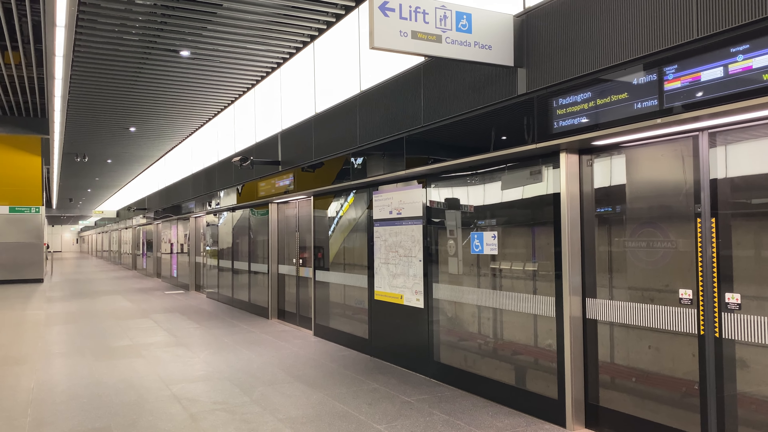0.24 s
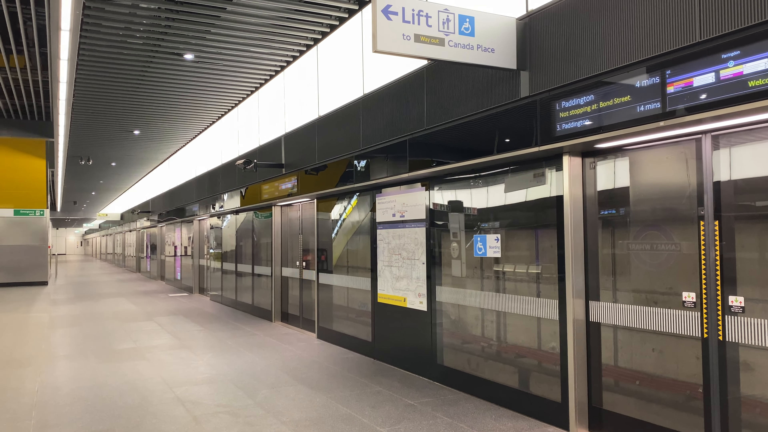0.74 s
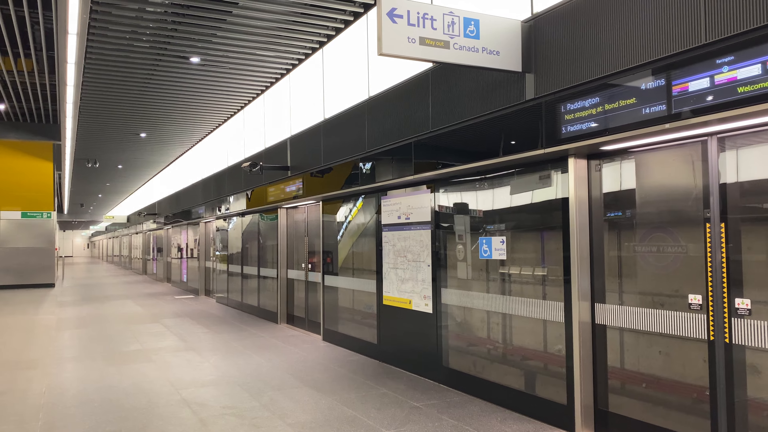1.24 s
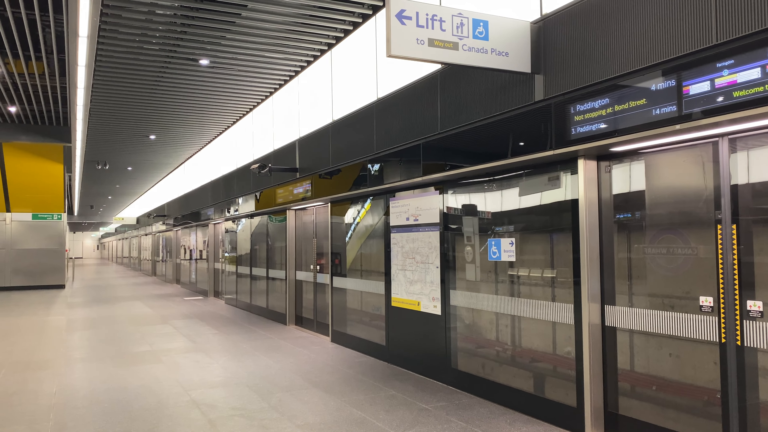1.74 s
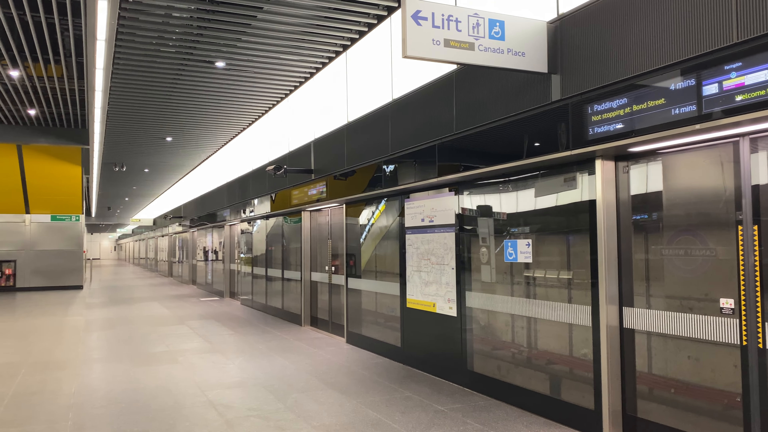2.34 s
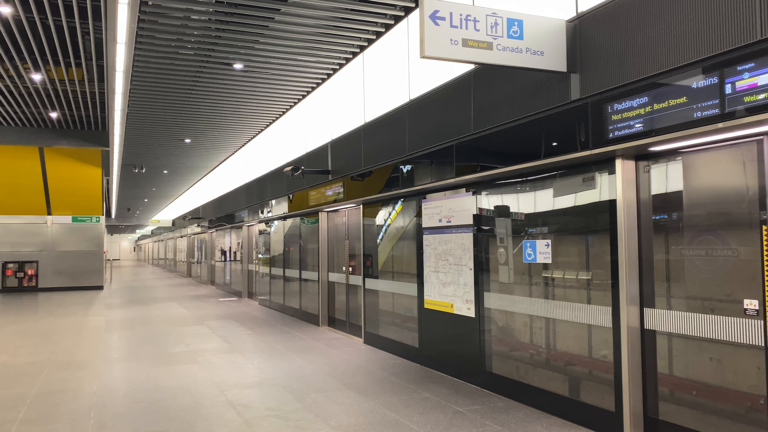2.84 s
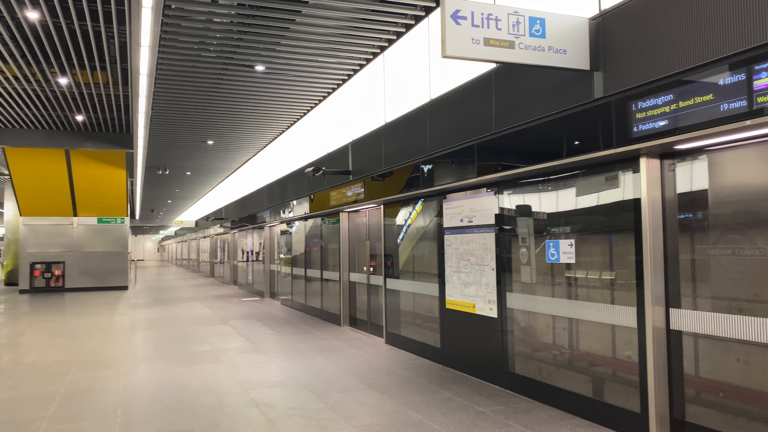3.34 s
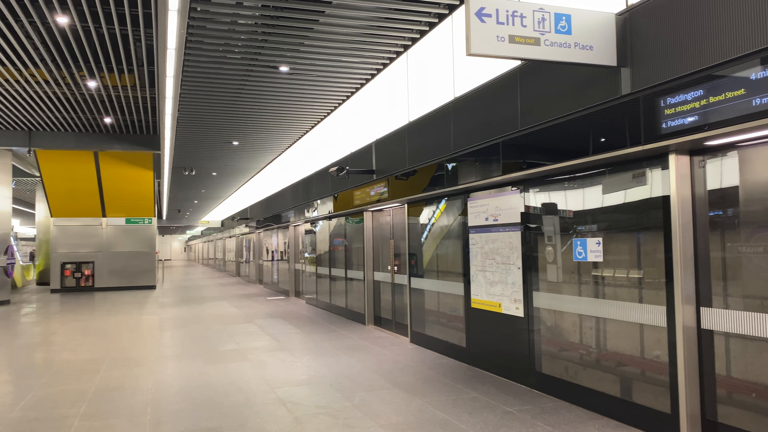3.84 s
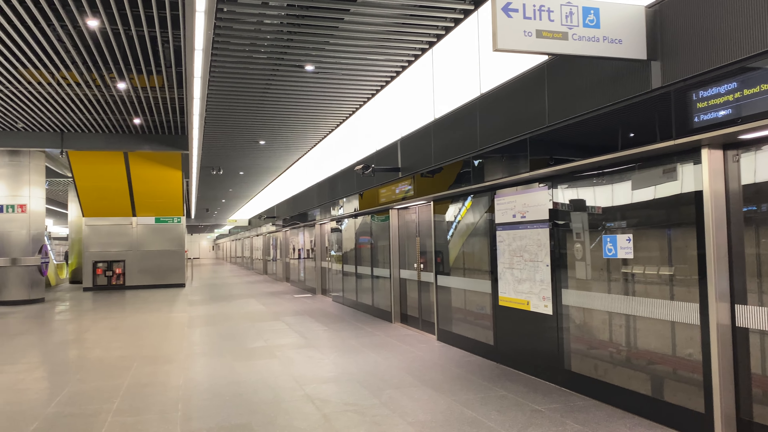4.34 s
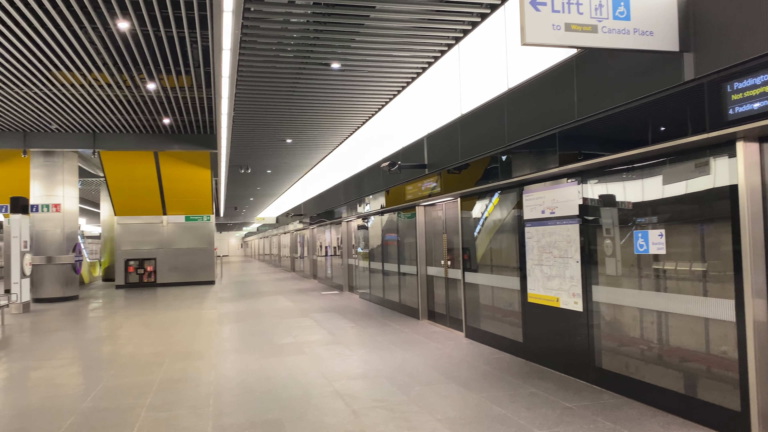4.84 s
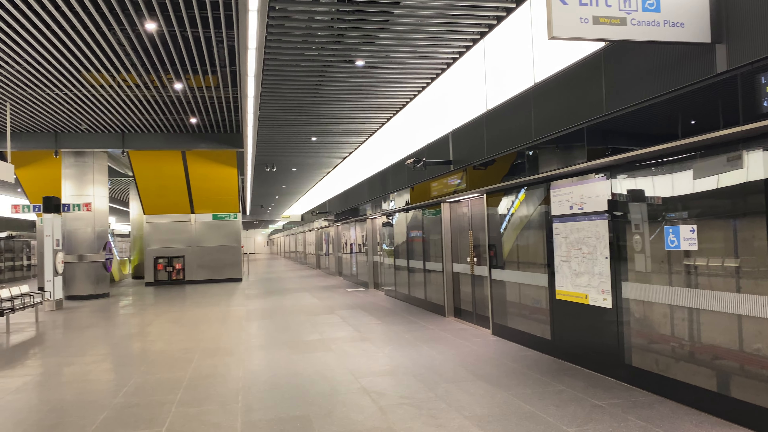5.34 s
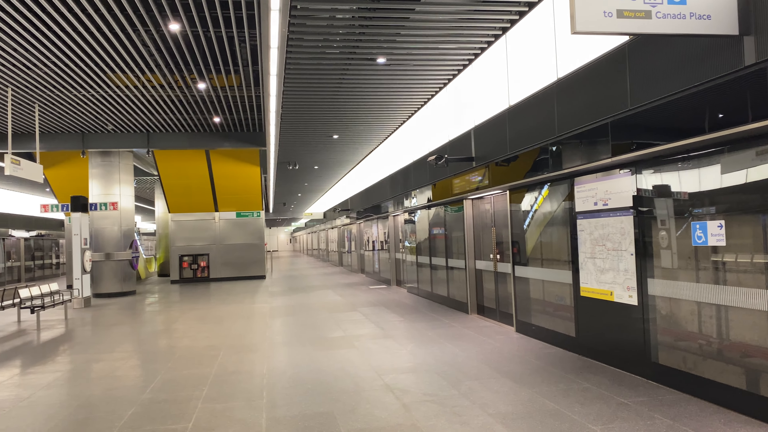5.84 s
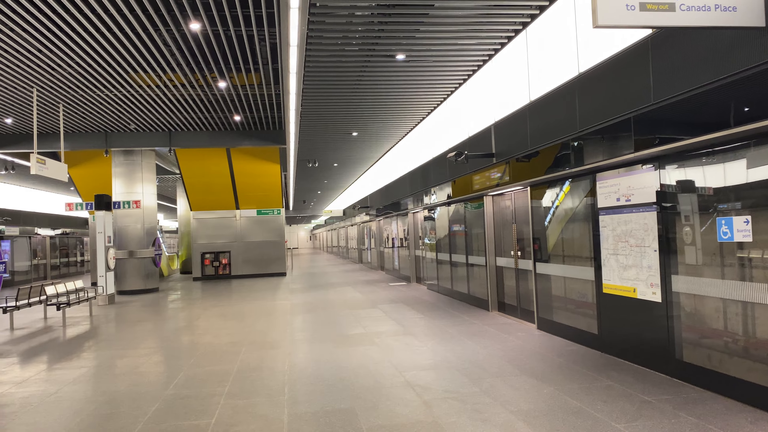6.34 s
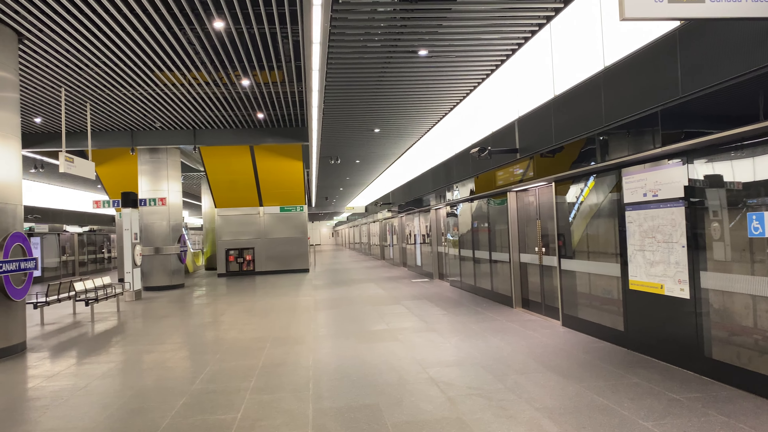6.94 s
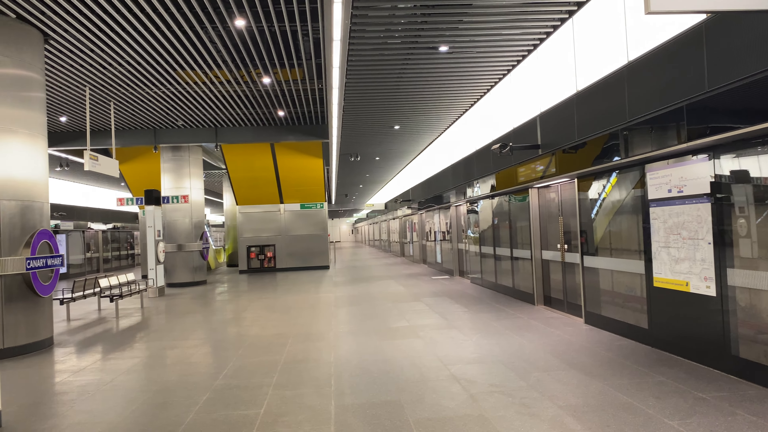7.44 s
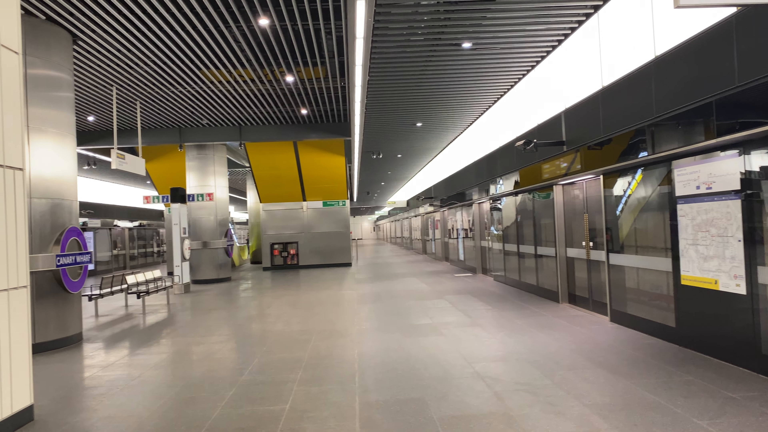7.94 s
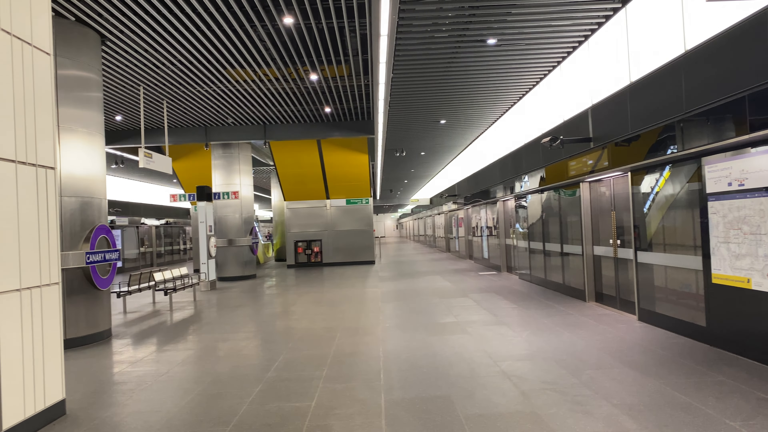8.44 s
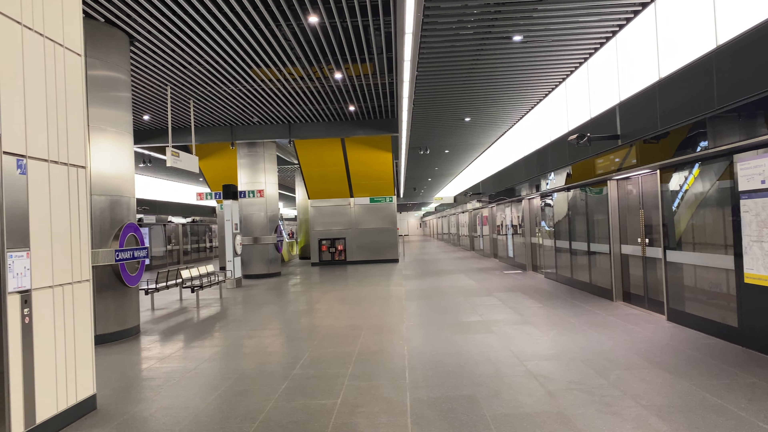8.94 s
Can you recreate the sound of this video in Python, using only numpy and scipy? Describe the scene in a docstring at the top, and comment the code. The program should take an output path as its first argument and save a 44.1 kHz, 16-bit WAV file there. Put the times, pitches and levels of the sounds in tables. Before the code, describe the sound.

On a hard, echoing underground platform, an electric train accelerates away behind glass screens. Fluttering motor tones rise in pitch over deep rumble and rushing wheel roar, with faint rail singing. The last car passes at about three and a half seconds, and the train recedes to a far rumble. Ventilation hiss, a thin electrical whine and light metal clinks remain. The stereo microphone stands on the platform, the train slightly right.

```python
"""An underground station with glass platform screens, as an electric train pulls out.
Its motors drone upward in pitch: wandering tones, one set Doppler-sharp and one flat, with a smeared echo.
Coloured noise makes the wheel roar, which sinks to a far rumble; swelling tones are rail and tunnel resonances.
Left behind are ventilation hiss (noise), a thin electrical whine (wavering tones)
and a few light metal clinks (noise bursts and decaying modes)."""
import sys
import numpy as np
from scipy import signal
from scipy.fft import rfft, irfft, next_fast_len
from scipy.io import wavfile
from scipy.ndimage import uniform_filter1d, map_coordinates

SR = 44100
rng = np.random.default_rng(int(sys.argv[2]) if len(sys.argv) > 2 else 0)


def wrap_up_sound(samples):
    """Save the sound to the file named by the first command line argument, as 16-bit audio."""
    columns = np.atleast_2d(samples).T
    # keep every value between -1 and 1, then stretch to whole-number steps
    tamed = np.clip(columns, -1, 1)
    steps = np.round(tamed * 32767).astype(np.int16)
    wavfile.write(sys.argv[1], SR, steps)


N = 404838
TIME = np.arange(N) / SR  # seconds


def amp(db):
    """Decibels to gain."""
    return 10 ** (np.asarray(db) / 20)


def unit(x):
    """Scale to rms 1."""
    return x / np.sqrt(np.mean(np.abs(x) ** 2) + 1e-20)


def along(points, hz):
    """Read (hz, value) points along a log frequency axis."""
    f, v = np.transpose(points)
    return np.interp(np.log(hz + 1), np.log(np.abs(f) + 1), v)


def curve(points):
    """Join (time_s, value) points with straight lines, one value per sample."""
    s, v = np.transpose(points)
    return np.interp(TIME, s, v)


def wobble(rate):
    """A smooth random curve with rate knots a second."""
    knots = np.random.default_rng(rng.integers(2 ** 31)).standard_normal(int(N * rate / SR) + 8)
    coarse = TIME[::32]
    smooth = map_coordinates(knots, [coarse * rate + 2], mode="mirror")
    return np.interp(TIME, coarse, smooth)


def filtered(x, response):
    """Shape the spectrum of x by a response given as a function of frequency."""
    m = next_fast_len(N + SR // 2)
    spectrum = rfft(x, m) * response(np.fft.rfftfreq(m, 1 / SR))
    return irfft(spectrum, m)[..., :N]


def rush(spectrum, patchy_db):
    """Two noises of joint rms 1, coloured by the spectrum, with drifting patches of gain in time and pitch."""
    z = signal.stft(rng.standard_normal((2, N)), nperseg=1024)[2]
    patches = uniform_filter1d(rng.standard_normal(z.shape[1:]), size=4, axis=0)
    patches = uniform_filter1d(patches, size=14, axis=1)
    pair = signal.istft(z * amp(patchy_db * unit(patches)), nperseg=1024)[1][:, :N]
    return unit(filtered(pair, lambda hz: amp(along(spectrum, hz))))


def smeared(hz, wander_hz, evenness=0):
    """A tone arriving by many changing paths: strength and phase wander, with wander_hz random knots a second."""
    paths = np.array([wobble(wander_hz) + 1j * wobble(wander_hz) for _ in range(2)])
    # evenness 1 nearly levels the strength and leaves the phase wandering
    paths = paths / (np.abs(paths) ** 2 + .1) ** (np.clip(evenness, 0, 1) / 2)
    carrier = np.exp(2j * np.pi * np.cumsum(hz + np.zeros(N)) / SR)
    return unit((paths * carrier).real)


def drone(hz, wander_rad):
    """A fluttering tone whose phase drifts by wander_rad in the first signal and more widely in the second."""
    flutter_db, flutter_rate = 2, 11  # typical depth, knots per second
    drift = np.array([wander_rad * wobble(7), np.pi * wobble(3)])
    drift = drift + rng.uniform(0, 2 * np.pi, (2, 1))
    tone = np.sin(2 * np.pi * np.cumsum(hz) / SR + drift)
    return unit(amp(flutter_db * wobble(flutter_rate)) * tone)


def motor_pitch():
    """The motor tone in Hz, rising with the train's speed, which grows ever more slowly."""
    start_hz, cruise_hz, speed_up_s = 142, 197, 4.6
    return cruise_hz - (cruise_hz - start_hz) * np.exp(-TIME / speed_up_s)


def receding(near_db, loss_db):
    """Gain of a layer that far off loses loss_db each time the distance to the train's tail doubles."""
    metres_per_cycle = 0.085  # track covered in one cycle of the motor tone
    tail_start_m = 9  # travel before the tail draws away
    near_m = 23.2  # distance within which the level nearly holds
    travel_m = metres_per_cycle * np.cumsum(motor_pitch()) / SR
    away_m = np.clip(travel_m - tail_start_m, 0, None)
    return amp(near_db - loss_db * np.log2(np.hypot(1, away_m / near_m)))


def tail_gone():
    """Rises smoothly from 0 to 1 as the last car passes the listener."""
    gone_s, pass_s = 3.53, .08  # midpoint, quickness
    return (1 + np.tanh((TIME - gone_s) / pass_s)) / 2


def motors():
    """Cars still approaching sound sharp, those gone by sound flat; echoes fill the gap between."""
    # tone of the cars approaching, swelling and fading in the tunnel: time_s, relative level_db
    ahead_levels = [(0, -20), (.33, -31), (.55, -27), (.75, -15.5), (1.0, -33.5), (1.35, -27), (1.8, -41),
                    (2.0, -18), (2.3, -47), (2.55, -25.5), (3.1, -23), (3.4, -29), (3.67, -39), (3.85, -26),
                    (4.03, -40.5), (4.3, -32), (4.7, -29.5), (5.07, -37.5), (5.38, -28), (5.85, -42),
                    (6.08, -31), (6.28, -36), (6.52, -27), (6.9, -42), (9.16, -47)]
    # tone of the cars that have gone by: time_s, relative level_db
    behind_levels = [(0, -20.5), (.3, -23.5), (.85, -27.5), (1.02, -16.5), (1.22, -26.5), (1.45, -21.5),
                     (1.73, -16.5), (1.92, -30), (2.2, -34.5), (2.45, -18.5), (2.7, -31.5), (3.0, -24.5),
                     (3.3, -22.5), (3.5, -25.5), (3.65, -40), (4.25, -32), (4.5, -39), (4.85, -28.5),
                     (5.1, -38), (5.3, -26.5), (5.85, -43), (9.16, -50)]
    # octave of the nearest bogie, its rise held back by Doppler shift: time_s, pitch_hz
    bogie_pitch = [(0, 286), (.8, 293), (1.3, 300), (1.7, 311), (2.2, 318), (3, 322)]

    hz = motor_pitch()
    doppler_start, doppler_full, doppler_s = .023, .044, .9  # shares of the pitch, time constant
    doppler = doppler_full - (doppler_full - doppler_start) * np.exp(-TIME / doppler_s)
    ahead = amp(curve(ahead_levels)) * drone(hz * (1 + doppler), wander_rad=.45)
    behind = amp(curve(behind_levels)) * drone(hz * (1 - doppler), wander_rad=.35)
    echoes = receding(near_db=-32.5, loss_db=6.5) * smeared(hz, wander_hz=40)
    tone = amp(-1.45) * (ahead + behind) + echoes

    # the octave is strong until the last driven bogie has passed; a faint echo stays
    bogie_gone_s, bogie_fade_db_per_s = 2.36, 18.5
    bogie = amp(-bogie_fade_db_per_s * np.clip(TIME - bogie_gone_s, 0, None))
    passing = amp(-29) * bogie * drone(curve(bogie_pitch), wander_rad=.55)
    wash_gain = np.hypot(amp(-27.2) * bogie, receding(near_db=-37, loss_db=4))
    wash = wash_gain * smeared(1.96 * hz, wander_hz=85)
    return tone + passing + wash


def rolling():
    """Wheels on rail shake the ground, roar down the tunnel and hiss through the screens while near."""
    # noise colours of the ground, the tunnel bore and the near wheels: pitch_hz, level_db per Hz
    ground_colour = [(20, -62.5), (32, -30.5), (48, -14.5), (65, -7.5), (82, -8.5), (102, -1), (135, -2),
                     (200, -7), (240, -11.5), (300, -19.5), (450, -40), (900, -88)]
    bore_colour = [(150, -9.5), (260, 2), (370, 0.5), (410, -4.5), (520, -3.5), (680, 0), (880, -2.5),
                   (1000, -7), (1120, -4), (1320, -11), (1400, -19), (2200, -24.5), (4000, -77)]
    wheel_colour = [(150, 5), (300, 11), (450, 19), (700, 12), (1000, -6.5), (1450, 6), (1750, 1),
                    (2100, -1), (2750, -5), (3100, -11.5), (4200, -18.5), (6000, -26.5), (12000, -58.5),
                    (13000, -50.5)]
    hiss_colour = [(2500, -11.5), (5500, 5.5), (8000, -13.5), (12000, -12.0), (13000, -29.5)]

    rumble = receding(near_db=-24, loss_db=2.5) * rush(ground_colour, patchy_db=0)
    bore = amp(0.42 * wobble(8.9)) * rush(bore_colour, patchy_db=1.8)
    tunnel = receding(near_db=-28.5, loss_db=5.5) * bore

    tail_drop_db = 1.75  # the wheel noise drops as the last car passes
    wheel_level_db = .3 * wobble(11) + 0.79 * wobble(60) - tail_drop_db * tail_gone()
    beside = amp(wheel_level_db) * rush(wheel_colour, patchy_db=1.5)
    wheels = receding(near_db=-31.5, loss_db=6.5) * beside

    # the brightest hiss sinks steadily from the start, by 8 dB a second
    hiss = amp(-61.5 - 8 * TIME) * rush(hiss_colour, patchy_db=2.5)
    # the rails sing faintly, more exposed as the near roar drops
    singing = smeared(1253, wander_hz=30) + amp(-2.5) * smeared(1315, wander_hz=30)
    rails = receding(near_db=-49.5, loss_db=3.5) * singing
    return rumble + tunnel + wheels + hiss + rails


def flanges():
    """The rear wheel flanges sing against the rail, in wandering tones, until the tail has passed."""
    tones = [(1316, 140, -51), (2056, 160, -59), (2740, 320, -60)]  # pitch_hz, wander_hz, level_db
    start_s, rise_s = 1.4, .5
    rubbing = np.clip((TIME - start_s) / rise_s, 0, 1) * (1 - tail_gone())
    return rubbing * sum(amp(db) * smeared(hz, wander) for hz, wander, db in tones)


def swells():
    """Rail and tunnel resonances, as wandering tones, rise out of the roar under bell curves and sink again."""
    # resonances the wheels stir: peak_s, spread_s (bell curve sigma), pitch_hz, wander_hz, peak level_db
    resonances = [(0.254, 0.41, 263.8, 36.7, -28), (0.616, 0.96, 565.2, 118, -37.5),
                  (1.902, 0.32, 351.7, 45, -32.5), (2.7, 0.88, 711.4, 150, -41),
                  (3.599, 0.31, 330.8, 42, -33), (4.25, 0.38, 128.3, 20.2, -31),
                  (5.902, 0.68, 1129, 136, -49.5), (6.203, 1.2, 372.6, 30, -46),
                  (6.45, 0.4, 106.5, 8.8, -33), (7.704, 0.27, 639, 120, -45.5), (8.092, 1.1, 873, 130, -51),
                  (8.499, 0.6, 76, 45, -39)]
    out = np.zeros((2, N))
    for peak_s, spread_s, hz, wander, db in resonances:
        bell = np.exp(-((TIME - peak_s) / spread_s) ** 2 / 2)
        out += amp(db) * bell * smeared(hz, wander)
    return out


def inverter():
    """The train's power electronics whistle at fixed pitches, fading by 12 dB a second from 3.5 s."""
    # whistles of the power electronics: pitch_hz, relative level_db
    whistles = [(3451, -71), (3752, -78)]
    leaving_db = -12 * np.clip(TIME - 3.5, 0, None)
    return amp(leaving_db + 2.0) * sum(amp(db) * smeared(hz, wander_hz=11) for hz, db in whistles)


def clinks():
    """Small metal contacts: a tick, then a scuff and a ring of decaying modes drawn out by the hall."""
    # contacts down the hall: start_s, ring_db, upper modes over the ring_db, top mode over the ring_db,
    # scuff_db, tick_db
    contacts = [(3.13, -78, -10, -16, -64.5, -79), (5.08, -83, 0, -12, -70.5, -84),
                (5.35, -77, -14, -20, -70.5, -79), (7.472, -65, 1, -1.5, -62, -62),
                (7.526, -66.5, -9, -22, -66, -70), (7.56, -74, -14, -22, -72, -80),
                (8.38, -76, 5, -12, -71, -84)]
    # ringing modes of the metal: pitch_hz, relative level_db, t60_s
    modes = [(5975, -2, .95), (5880, -5, .5), (6090, -7, .35), (6350, -13, .3), (9170, -10, .45),
             (9850, -11, .55), (10050, -10.5, .55), (11610, -3.5, .2)]
    # noise colour of the scuff: pitch_hz, level_db per Hz
    scuff_colour = [(2500, -18.5), (4500, 2), (6200, 8.5), (7300, 3.5), (8600, -11.5), (10000, -3.5),
                    (10900, -15), (12000, -6.5), (13000, -28)]
    tick_colour = [(4000, -25), (6200, 3), (8000, -3), (10000, -3), (12700, -5), (13500, -28)]

    rings = []
    for hz, db, t60 in modes:
        register = np.digitize(hz, [8000, 11000])  # 0 main, 1 upper, 2 top
        mode = amp(db) * smeared(hz, wander_hz=hz / 55, evenness=.3)
        rings.append((register, mode, t60))
    scuff = rush(scuff_colour, patchy_db=1.5)
    tick = rush(tick_colour, patchy_db=1)

    out = np.zeros((2, N))
    for start_s, ring_db, upper_db, top_db, scuff_db, tick_db in contacts:
        start = round(start_s * SR)
        part = slice(start, start + SR)  # each contact lasts at most 1 s
        t = TIME[part] - TIME[part][0]
        ring = 0
        for register, mode, t60 in rings:
            # each mode's ring is followed by its fainter, longer echo
            fade = amp(-60 * t / t60) + amp(-11 - 15 * t / t60)
            ring = ring + mode[:, part] * amp([0, upper_db, top_db][register]) * fade
        contact = amp(tick_db - 350 * t) * tick[:, part] + amp(scuff_db - 70 * t) * scuff[:, part]
        onset = 1 - np.exp(-t / .001)
        out[:, part] += onset * (amp(ring_db) * ring + contact)
    return out


def station():
    """Ventilation hiss and a deep tunnel draught from noise, and a thin whine from slightly wavering tones."""
    # noise colours of the ventilation and of the tunnel's deep rumble: pitch_hz, level_db per Hz
    air_colour = [(100, 3.5), (1000, 9), (2200, 8), (2900, 1.5), (4100, 2), (5200, -4.5), (6500, -7.5),
                  (7300, -11), (8100, -16), (9000, -25), (10500, -18.5), (12000, -23), (12700, -42),
                  (15000, -41.5)]
    draught_colour = [(15, -67), (24, -44), (32, -12), (46, 8), (62, 4), (85, -1.5), (160, -46.5),
                      (400, -120)]
    # electrical tones of the station: pitch_hz, relative level_db
    whine_tones = [(3752, -78), (6750, -90), (6901, -91.5), (6998, -85), (7101, -83), (7197, -87.5),
                   (7300, -92), (7402, -91.5)]
    air = amp(-51.5) * rush(air_colour, patchy_db=.9)
    draught = amp(-39.5) * rush(draught_colour, patchy_db=0.5)
    whine = sum(amp(db) * smeared(hz, wander_hz=4.1, evenness=.5) for hz, db in whine_tones)
    return air + amp(1.0) * whine + draught


def hall(pair):
    """Two signals become a wide stereo field: alike in the bass, with the right channel leading in phase."""
    # likeness of the left and right channels: pitch_hz, likeness (0-1)
    likeness = [(50, 1), (150, 0.89), (300, 0.66), (450, 0.32), (800, 0.24), (1400, 0.28), (2000, 0.13),
                (2600, 0.43), (5000, 0.15), (7000, 0.5), (9000, 1)]
    # phase by which the left channel leads (negative: the right leads): pitch_hz, lead_rad
    left_lead = [(45, -.11), (200, -.27), (350, -.7), (450, -1.45), (750, -1.75), (1250, -1.5), (1550, -3),
                 (2100, -5.5), (3300, -5.5), (4200, -6.5), (5300, -9.3), (7000, -6.1), (9000, -9.4),
                 (11000, -12.6)]

    def spread(hz):
        turn = np.arccos(np.clip(along(likeness, hz), 0, 1)) / 2
        return np.array([np.cos(turn), np.sin(turn)])

    def lead(hz):
        return np.exp(.5j * along(left_lead, hz) * np.array([[1], [-1]]))

    mid, side = filtered(pair, spread)
    return filtered(np.array([mid + side, mid - side]), lead)


def scene():
    """Everything reaches the platform through the hall, the train a little to the right."""
    train = hall(motors() + rolling() + flanges() + swells() + inverter())
    return train * amp([[-.4], [.4]]) + hall(station() + clinks())


def record(dry):
    """Cut everything from 15.1 kHz up."""
    top_hz = 15100
    return filtered(dry, lambda hz: hz < top_hz)


dry = scene()
out = record(dry)
wrap_up_sound(out)
```